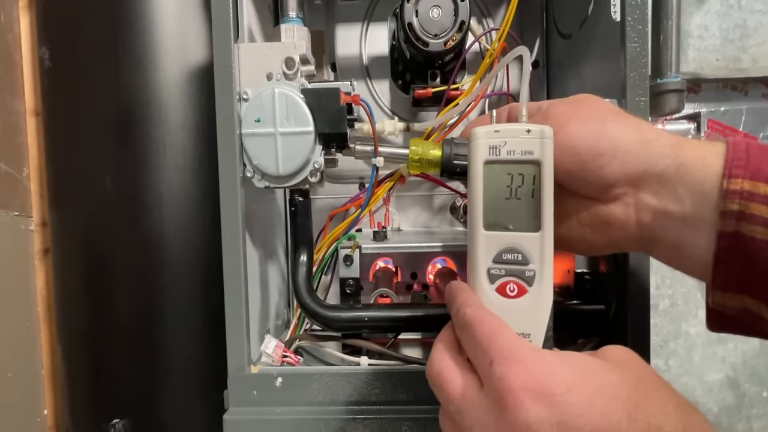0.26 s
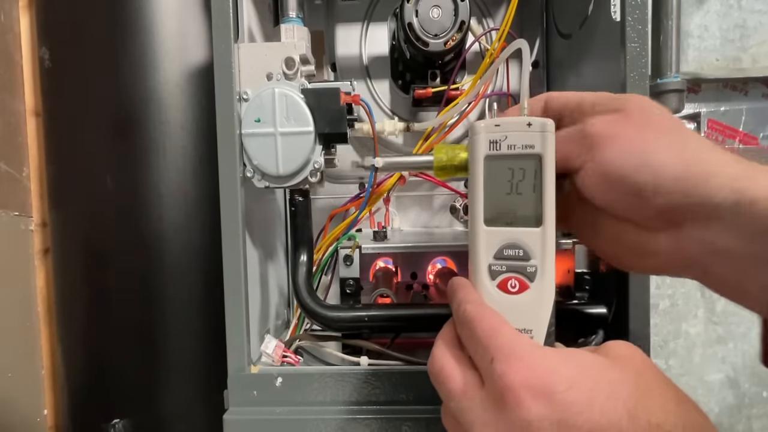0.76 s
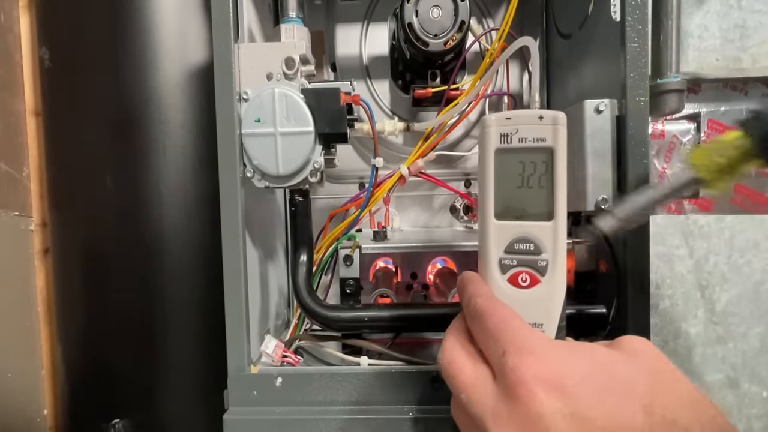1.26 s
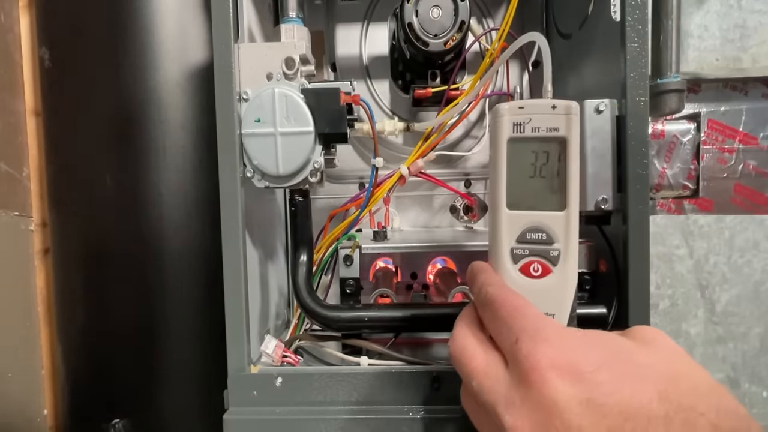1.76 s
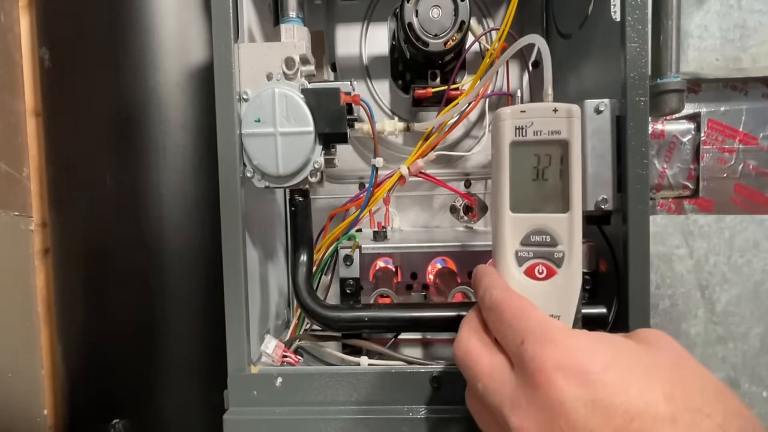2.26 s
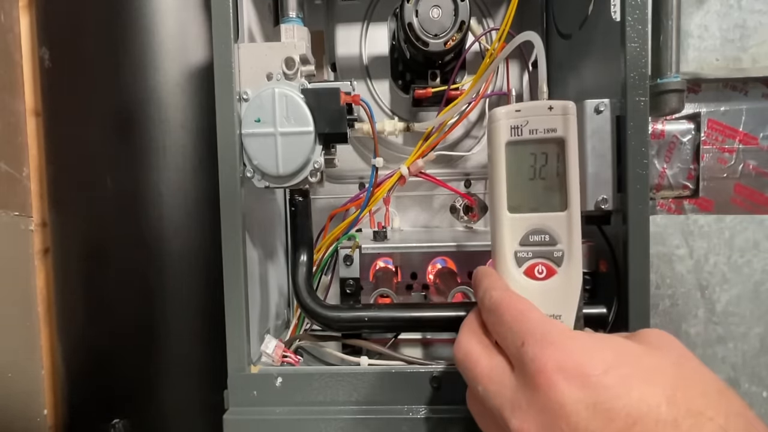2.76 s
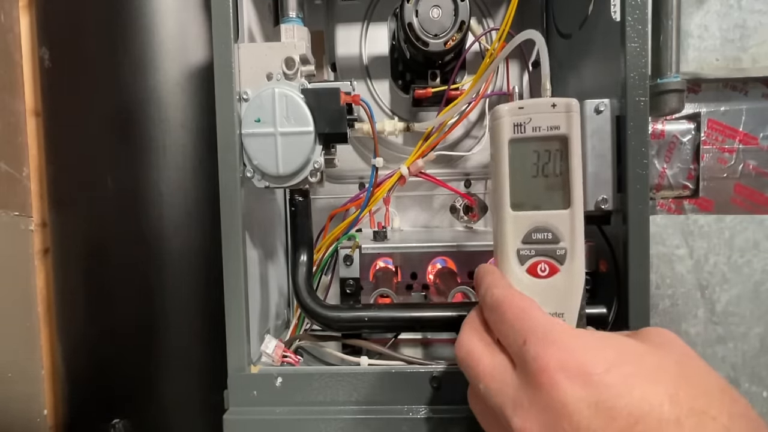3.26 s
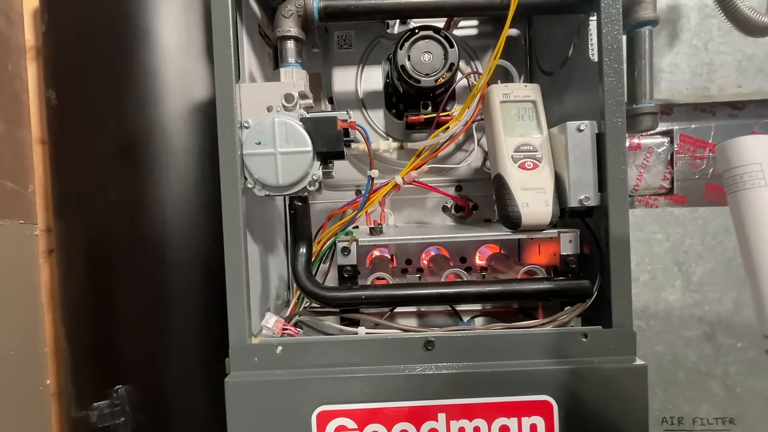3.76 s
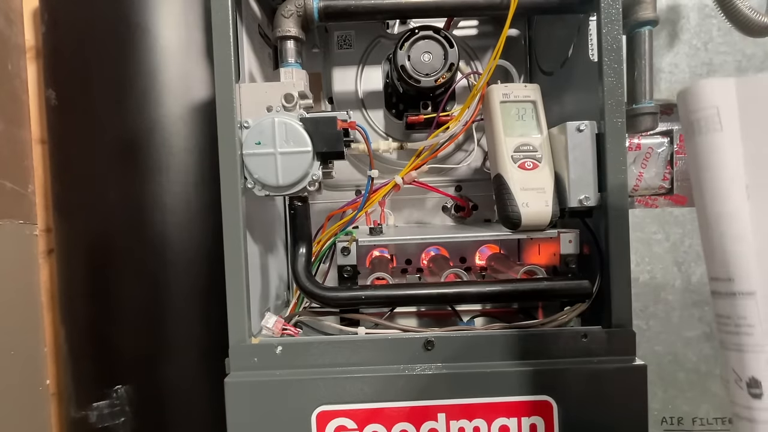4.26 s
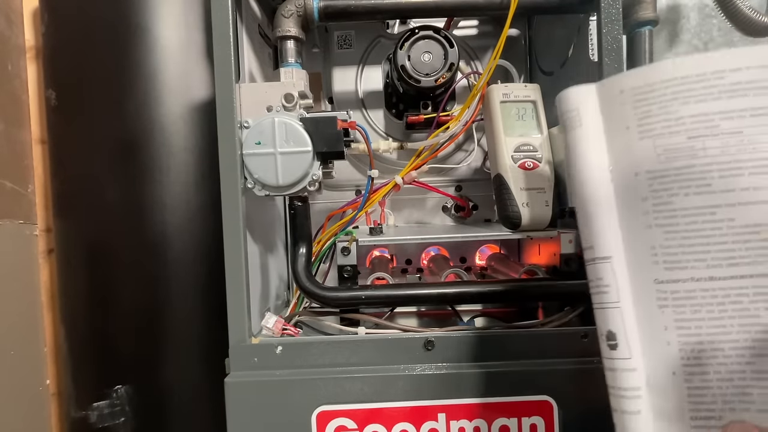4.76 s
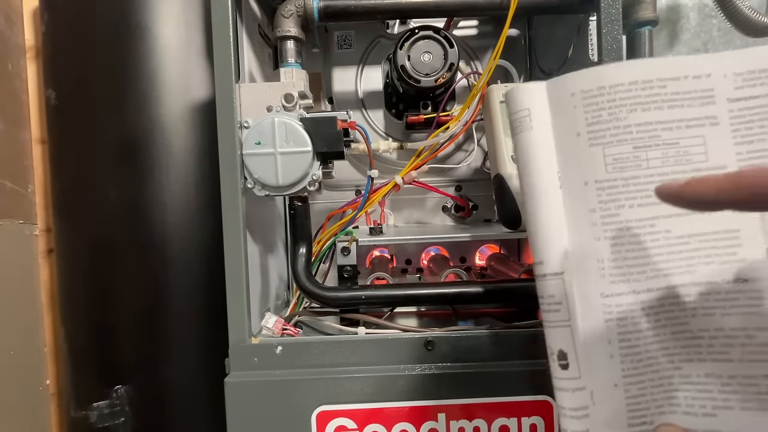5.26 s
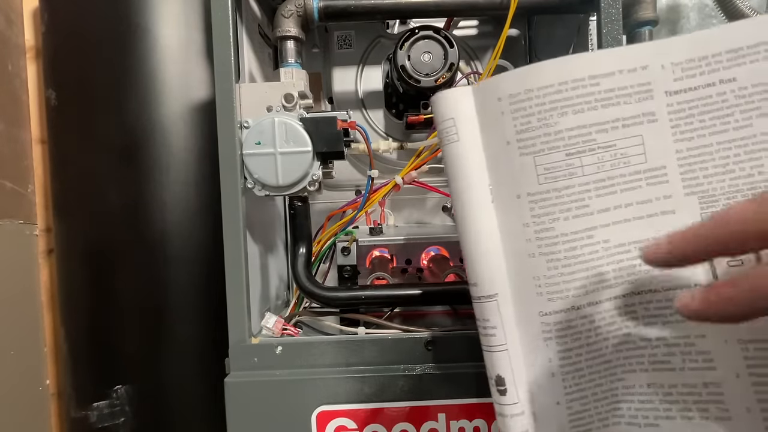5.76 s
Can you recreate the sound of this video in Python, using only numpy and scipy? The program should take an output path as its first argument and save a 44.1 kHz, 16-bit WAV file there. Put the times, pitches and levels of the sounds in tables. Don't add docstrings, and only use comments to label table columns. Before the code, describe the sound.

An open gas furnace runs without pause indoors, heard close by in stereo with little deep bass and a slightly compressed, grainy top. From 0 to about 3.3 seconds it is a step back: turbulent flames roar low in the tubes, with unsteady hollow howls that swell, sag and waver in pitch, beneath the broad airy rush of a draft fan in a sheet-metal cabinet. Fuzzy gas whistles add a thin hiss, leaning left. A barely audible dry tap falls near 1.9 seconds. At 3.3 seconds an abrupt cut, with another almost hidden tap, brings the sound nearer, louder and fuller, with a faint bright sizzle more apparent. The roar and howl keep fluttering. From about 4.5 seconds a booklet gradually shades the opening; upper rush lifts briefly near 5.2, then hiss softens while the low roar holds strong. A last very faint tap comes around 5.85.

```python
import sys
import numpy as np
from scipy import signal
from scipy.fft import rfft, irfft, next_fast_len
from scipy.io import wavfile
from scipy.ndimage import uniform_filter1d

SR = 44100
rng = np.random.default_rng(int(sys.argv[2]) if len(sys.argv) > 2 else 0)


def store_wav(level_fs):
    pcm = np.round(np.clip(np.atleast_2d(level_fs), -1, 1) * 32767)
    wavfile.write(sys.argv[1], SR, pcm.T.astype(np.int16))


def gain_from_db(level_db):
    decades = np.asarray(level_db, float) / 20
    return 10 ** decades


N = 264600
SIZE = next_fast_len(N)
HZ = np.fft.rfftfreq(SIZE, 1 / SR)
T = np.arange(N) / SR
MOVE_S = 3.328


def flames():
    # resonance in Hz, width in Hz, left level in dB per Hz, right level in dB per Hz.
    tubes = [
        [(68, 28, -69, -72.5), (88, 95, -63, -63), (146.5, 91, -63, -63.5), (201, 17, -65, -58.5), (258, 64, -68, -79), (275, 39.4, -63, -58.5), (358, 94, -66, -63), (382.5, 62, -65, -59.5), (360, 180, -94.0, -69), (460, 28, -62.5, -66), (523.5, 43, -66.5, -104.0), (558, 28, -66.5, -69), (580, 170, -106.0, -76.5), (623, 51, -73, -106.0), (710, 130, -78.5, -81.5)],
        [(59.82, 19, -58, -59), (97.4, 61, -55, -56.5), (132, 163, -60.5, -61.5), (196.5, 16, -61, -53.5), (244, 97, -66, -73), (284, 64, -59.5, -56), (355, 170, -94.0, -62.5), (379, 18, -60, -61), (398.6, 8, -49, -68), (453.5, 50, -60, -99.0), (497, 66, -65.5, -64), (563, 100, -67.5, -80.0), (607, 80, -100.0, -74), (617, 86, -69, -70), (728, 49, -71, -69.5)],
    ]
    tube_ports = [
        [(-0.1, 0.93), (-0.1, 0.97), (-0.3, 0.93), (-0.4, 0.96), (-0.0, 0.99), (-0.1, 0.99), (1.1, 0.9), (1.2, 0.93), (1.2, 0.89), (2.6, 0.93), (1.0, 0.66), (2.3, 0.77), (2.4, 0.65), (1.0, 0.76), (-0.1, 0.58)],
        [(-0.0, 0.98), (-0.1, 1.0), (-0.1, 0.96), (-0.1, 0.98), (0.1, 0.98), (0.1, 0.99), (0.7, 0.67), (1.5, 0.91), (1.5, 0.93), (-2.9, 0.47), (-1.2, 0.38), (1.5, 0.28), (2.4, 0.3), (0.7, 0.72), (1.1, 0.76)],
    ]
    return gain_from_db(-0.79) * layer_gain(row=0) * two_places(tubes, tube_ports)


def howl():
    # far pitch in Hz, near pitch in Hz, far level in dB, near level in dB.
    rest_tones = [
        (96, 96, -48.5, -44),
        (195.1, 198.5, -49.5, -44.5),
        (281, 288, -50, -46),
    ]
    pans_db = (1.5, -7.5, -6.5)
    wobbles_hz = (8.5, 5.8, 5.2)
    # middle in seconds, pitch in Hz, change in dB, length in seconds.
    surges = [(.01, 82, 8, 0.1), (.19, 100.3, 6, .1), (0.229, 283, 10, 0.15), (.34, 97.8, -1, .11),
              (3.956, 202.9, 1.5, .2), (0.617, 193.4, -8, 0.077), (0.852, 286.5, 1.5, 0.11),
              (1.136, 281, -11, 0.29), (1.443, 96.3, 5, .13), (1.549, 286, 4.5, 0.16),
              (1.644, 195.2, 3.5, .14), (1.85, 281, 8, .17), (2.211, 195, 7.5, 0.12),
              (2.455, 92.4, 11, .13), (2.6, 90.2, 9.5, .1), (2.809, 196.3, 5, 0.13),
              (4.58, 198.8, -5, 0.19), (3.17, 189.8, 5, .12), (3.267, 281, 4, 0.14), (3.88, 286, 7, 0.18),
              (4.223, 94.7, 10, .15), (4.248, 199, 4.5, 0.37), (4.62, 292.8, 7, 0.068),
              (4.79, 197.1, 6.5, .14), (5.26, 96, 3, 0.08), (5.311, 196.2, 3.5, .12),
              (5.38, 282.3, 8.5, .25), (5.54, 284.8, -15, 0.068), (5.708, 93.8, 5.5, 0.075),
              (5.8, 199, -16, .15)]
    flutter_db = 2
    out = np.zeros((2, N))
    for (far_hz, near_hz, far_db, near_db), pan_db, wobble_hz in zip(rest_tones, pans_db, wobbles_hz):
        rest_hz = np.where(T < MOVE_S, far_hz, near_hz)
        hz, lock = rest_hz, 0
        db = far_db + (near_db - far_db) * moved() + flutter_db * wander(size=2500)
        for middle_s, surge_hz, change_db, length_s in surges:
            if abs(surge_hz - far_hz) < 40:
                swell = np.exp(-(2 * (T - middle_s) / length_s) ** 2)
                hz = hz + swell * (surge_hz - rest_hz)
                db = db + swell * change_db
                lock = lock + swell
        steadied = 1 - 0.403 * np.minimum(lock, 1)
        turns = np.cumsum(hz + wobble_hz * wander(size=1500) * steadied) / SR
        out += panned(pan_db) * np.sqrt(2) * gain_from_db(db) * np.sin(2 * np.pi * turns)
    return out


def draft_fan():
    # resonance in Hz, width in Hz, left and right level in dB per Hz.
    cabinet_far = [(798, 38, -69.5, -73.5), (880, 57, -71, -70.5), (920, 42, -81.5, -76),
                   (978, 79, -71.5, -74.5), (1037, 180, -77.5, -76.0), (1120, 87, -105.0, -79.0),
                   (1207, 103, -75.5, -77.5), (1316, 72, -79, -80), (1477, 300, -82, -87),
                   (1600, 59, -77, -89), (1696, 78, -77, -80), (1840, 66, -88.0, -85),
                   (1887, 146, -81.5, -80), (2070, 81, -82, -84), (2242, 300, -81.5, -91),
                   (2543, 120, -85.5, -81), (2740, 280, -88.5, -91), (2970, 610, -91.5, -94.5),
                   (3270, 240, -88, -95)]
    cabinet_near = [(803, 111, -75.5, -73), (830, 52, -69.5, -78), (936, 65, -67, -71.5),
                    (990, 50, -73, -77), (1034, 36, -71.5, -72), (1092, 103, -77, -73.5),
                    (1176, 165, -73, -83), (1233, 290, -74.5, -77.5), (1467, 84, -77.0, -74.5),
                    (1567, 87, -74.5, -79.5), (1635, 78, -72, -79), (1760, 77, -79, -75.5),
                    (1864, 61, -77, -80.5), (1980, 330, -82.5, -82), (2253, 250, -81, -82.5),
                    (2550, 110, -82.5, -83.5), (2730, 260, -82.5, -86), (2950, 270, -86.5, -89),
                    (3250, 400, -88.5, -96)]
    cabinet_ports = [
        [(-0.6, 0.9), (-0.3, 0.93), (-0.2, 0.93), (-0.1, 0.69), (0.1, 0.6), (0.6, 0.6), (1.6, 0.24), (-0.4, 0.53), (-0.6, 0.24), (0.4, 0.37), (0.3, 0.68), (-0.1, 0.57), (-0.4, 0.72), (2.0, 0.52), (1.4, 0.6), (1.5, 0.84), (2.0, 0.71), (2.3, 0.59), (2.1, 0.62)],
        [(1.1, 0.71), (1.4, 0.7), (1.4, 0.08), (0.2, 0.38), (0.4, 0.32), (-3.1, 0.27), (-1.4, 0.55), (-1.2, 0.5), (0.0, 0.33), (0.1, 0.51), (0.3, 0.57), (0.2, 0.67), (0.1, 0.63), (0.7, 0.42), (1.2, 0.48), (1.8, 0.77), (2.1, 0.73), (2.3, 0.65), (2.2, 0.56)],
    ]
    upper_from_hz = 2400
    air = two_places((cabinet_far, cabinet_near), cabinet_ports)
    rush = rfft(unsteady(air, patchy_db=0.81, flicker_db=0.06, size=512), SIZE)
    upper = 1 / (1 + (upper_from_hz / (HZ + 1)) ** 16)
    low, high = irfft(np.array([rush * (1 - upper), rush * upper]), SIZE)[..., :N]
    return gain_from_db(-0.1) * (layer_gain(row=1) * low + layer_gain(row=2) * page_echo() * high)


def page_echo():
    lift_db, middle_s, length_s = 1.5, 5.19, 0.41
    return gain_from_db(lift_db * np.exp(-((T - middle_s) / length_s) ** 4))


def gas_jets():
    # whistle in Hz, width in Hz, left level in dB per Hz, right level in dB per Hz.
    jets = [
        [(3560, 490, -93, -97.5), (4310, 980, -95, -98), (4692, 440, -92, -96.5), (5120, 735, -96.5, -102.0), (5920, 520, -87.0, -94), (6643, 701, -95, -105.0), (6891, 444, -100.0, -104.0), (7720, 760, -94.5, -102.0), (8570, 1400, -99, -100.0)],
        [(3550, 680, -90, -95.5), (4430, 880, -88.5, -92.5), (4690, 390, -85.5, -96), (5120, 830, -90.0, -100), (5984, 700, -82.5, -90), (6453, 365, -93, -97.0), (6870, 700, -92.5, -96), (7770, 780, -88.5, -97.5), (8370, 800, -91.5, -96)],
    ]
    jet_ports = [
        [(2.5, 0.18), (0.8, 0.21), (-2.5, 0.37), (-2.5, 0.37), (-0.5, 0.69), (0.6, 0.42), (-0.0, 0.32), (-0.2, 0.24), (2.2, 0.14)],
        [(2.0, 0.35), (1.4, 0.27), (2.8, 0.13), (3.1, 0.28), (-0.4, 0.4), (0.1, 0.18), (0.0, 0.28), (-0.4, 0.18), (1.8, 0.29)],
    ]
    whistles = unsteady(two_places(jets, jet_ports), patchy_db=0.78, flicker_db=0.4, size=512)
    return gain_from_db(0.12) * layer_gain(row=3) * whistles


def sizzle():
    # frequency in Hz, level in dB per Hz.
    sizzle_tilt = [(8000, -17), (8800, -9), (9500, -3), (10100, 7), (10700, 3), (11800, 1), (12300, -10),
                   (12800, -5), (13300, -25), (14000, -37), (16000, -47)]
    share_db, lag_s, aligned_hz = -3.5, 0.00033, 8856
    hz, db = np.transpose(sizzle_tilt)
    colour = gain_from_db(np.interp(np.log(HZ + 1), np.log(hz), db, left=-99))
    direct, stray_sum, stray_difference = chance(count=3) * colour
    half_turn = np.pi * lag_s * (HZ - aligned_hz)
    both = np.cos(half_turn) * direct + 0.22 * stray_sum
    apart = -1j * np.sin(half_turn) * direct + 0.25 * stray_difference
    pair = irfft(np.array([both + apart, both - apart]), SIZE)[:, :N]
    hiss = unsteady(evened(pair), patchy_db=0.2, flicker_db=0.5, size=512)
    return gain_from_db(share_db) * layer_gain(row=4) * hiss


def ticks():
    # start in seconds, peak in dB, pitch in Hz, left over right in dB.
    taps = [
        (1.9016, -50, 5870, 5.5),
        (3.3273, -58.5, 5830, 12.0),
        (5.8516, -59, 5740, 10),
    ]
    out, t = np.zeros((2, N)), np.arange(300) / SR
    for start_s, peak_db, hz, pan_db in taps:
        tap = gain_from_db(peak_db - 60 * t / 0.0082) * np.sin(2 * np.pi * hz * t)
        first = round(start_s * SR)
        out[:, first:first + len(t)] += panned(pan_db) * tap
    return out


def two_places(tables, ports):
    far, near = map(ringing, tables, ports)
    return far + (near - far) * moved()


def ringing(modes, ports):
    hz, width, left_db, right_db = np.transpose(modes)
    shape = 1 / (1 + (2.33 * (HZ[:, None] - hz) / width) ** 2) ** 2
    left, right = np.sqrt(shape @ gain_from_db(2 * left_db)), np.sqrt(shape @ gain_from_db(2 * right_db))
    lead, like = np.transpose(ports)
    lead = np.interp(HZ, hz, np.unwrap(lead))
    like = np.interp(HZ, hz, like) ** 0.7
    shared, other = chance(count=2)
    left_port = left * shared * np.exp(1j * lead)
    right_port = right * (like * shared + np.sqrt(1 - like ** 2) * other)
    pair = irfft(np.array([left_port, right_port]), SIZE)[:, :N]
    return np.sqrt(SR * SIZE / 4) * pair


def chance(count):
    re, im = rng.standard_normal((2, count, len(HZ)))
    return re + 1j * im


def unsteady(x, patchy_db, flicker_db, size):
    z = signal.stft(x, nperseg=size, noverlap=size * 3 // 4)[2]
    patches = uniform_filter1d(rng.standard_normal(z.shape[1:]), size=10, axis=0)
    patches = uniform_filter1d(patches, size=12, axis=1)
    flicker = uniform_filter1d(rng.standard_normal(z.shape[2]), size=3)
    z = z * gain_from_db(patchy_db * patches / patches.std() + flicker_db * flicker / flicker.std())
    return signal.istft(z, nperseg=size, noverlap=size * 3 // 4)[1][:, :N]


def layer_gain(row):
    # far dB, near dB, excess on arrival far in dB, the same near, loss under full cover in dB.
    layers = [
        (0, -.5, 2, 0.7, -0.8),
        (0, 0.4, 0.5, 2.5, 2),
        (0, 3, -1, -5, 5),
        (0, 1.15, .6, -0.9, 4.5),
        (-58, -51, .6, -0.7, 2.4),
    ]
    # time in seconds, covered share from 0 to 1.
    cover = [
        (0, 0),
        (4.4, 0),
        (4.9, 0.25),
        (5.25, .35),
        (5.5, 0.67),
        (5.8, .8),
        (6, 0.98),
    ]
    settle_s = 0.6
    far_db, near_db, far_excess_db, near_excess_db, loss_db = layers[row]
    near = T >= MOVE_S
    settle = np.exp(-((T - near * MOVE_S) / settle_s) ** 2)
    place_db = np.where(near, near_db + near_excess_db * settle, far_db + far_excess_db * settle)
    return gain_from_db(place_db - loss_db * np.interp(T, *np.transpose(cover)))


def moved():
    return np.clip((T - MOVE_S) / 0.0003, 0, 1)


def wander(size):
    drift = uniform_filter1d(uniform_filter1d(rng.standard_normal(N), size=size), size=size)
    return drift / drift.std()


def evened(x):
    return x / np.sqrt(np.mean(x.mean(0) ** 2) + 1e-20)


def panned(pan_db):
    return gain_from_db(np.array([[pan_db], [-pan_db]]) / 2)


def scene():
    return flames() + howl() + draft_fan() + gas_jets() + sizzle() + ticks()


def joint_stereo(pair):
    hz, t, (left, right) = signal.stft(pair, SR, nperseg=2048, noverlap=1024)
    z = np.array([left + right, left - right]) / 2
    band = np.arange(len(hz)) // 4
    power = uniform_filter1d(abs(z) ** 2, size=4, axis=1, origin=-2)[:, band * 4]
    power = uniform_filter1d(power, size=3, axis=2)
    mask = uniform_filter1d(power.mean(0), size=60, axis=0)
    keep = (power > gain_from_db(-16.5) * mask) | (hz[:, None] < 2200)
    whim = rng.random((2, len(t)))
    spare = rng.random((len(t), len(hz))).T[band // 4]
    keep[0, (hz > 9624) & (hz < 10460)] = False
    thin = (hz > 8700) & (hz < 9050)
    keep[1, thin] &= spare[thin] < 0.45
    top = hz > 11720
    keep[1, top] = (whim[1] < 0.13) & (spare[top] < 0.55)
    sum_top_hz = 12200 + 850 * whim[0] ** 2 + 900 * (whim[0] > 0.96)
    keep[0] &= hz[band // 2 * 8, None] < sum_top_hz
    keep[1] &= hz[:, None] < 13800
    keep[..., round(MOVE_S * SR / 1024) + 1] |= abs(hz - 14000) > 500
    both, apart = signal.istft(z * keep, SR, nperseg=2048, noverlap=1024)[1][:, :N]
    return np.array([both + apart, both - apart])


def low_pass(x):
    return signal.sosfilt(signal.butter(12, 16000, fs=SR, output="sos"), x)


def record(dry):
    bass_cut = np.sqrt(gain_from_db(-52) + 1 / (1 + (47 / (HZ + 1)) ** 11))
    heard = irfft(rfft(dry, SIZE) * bass_cut, SIZE)[:, :N]
    return low_pass(joint_stereo(heard))


dry = scene()
out = record(dry)
store_wav(out)
```